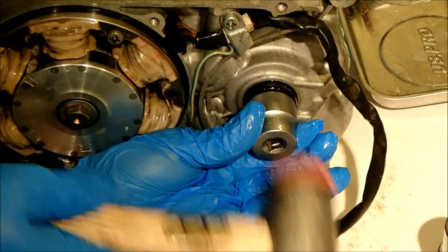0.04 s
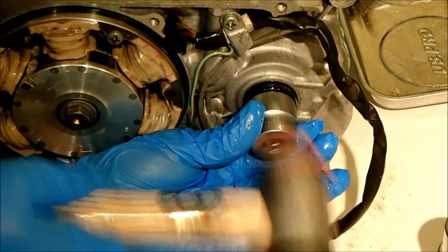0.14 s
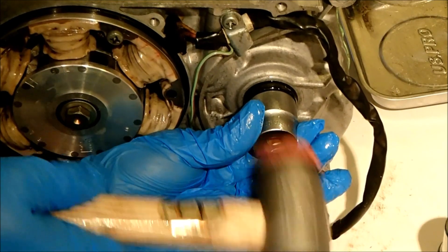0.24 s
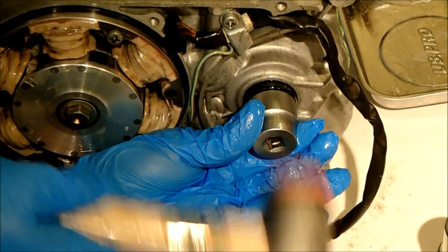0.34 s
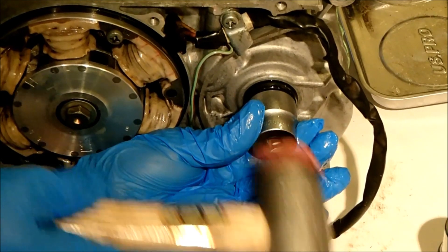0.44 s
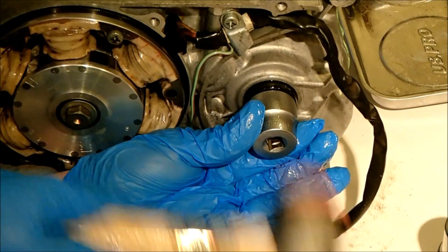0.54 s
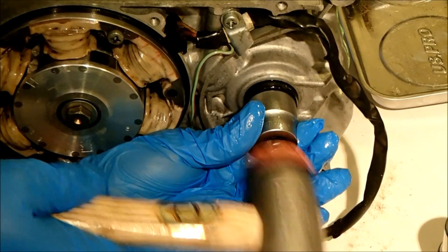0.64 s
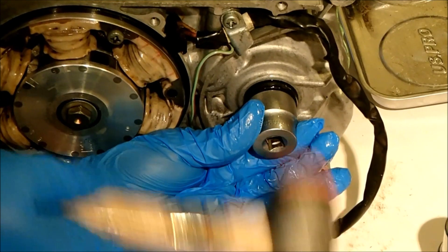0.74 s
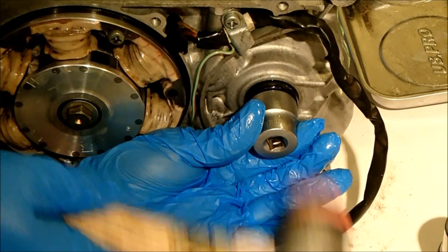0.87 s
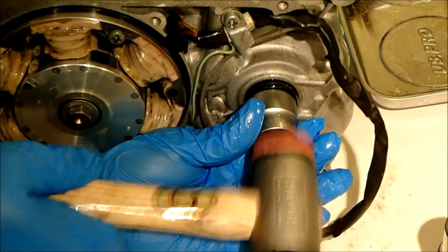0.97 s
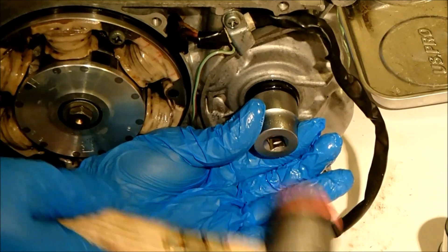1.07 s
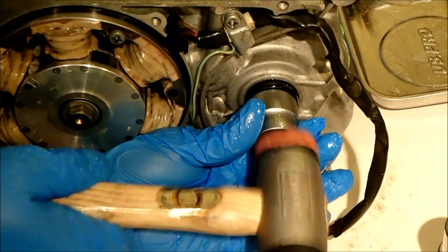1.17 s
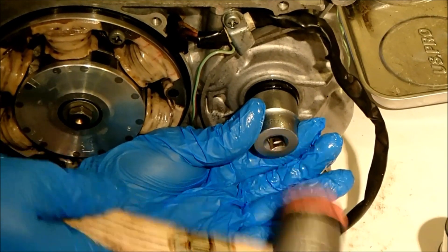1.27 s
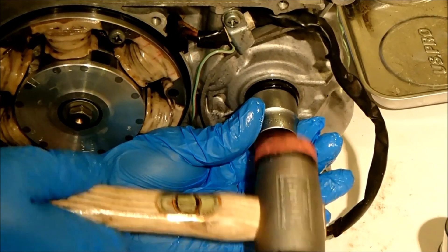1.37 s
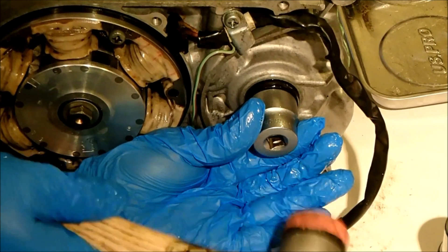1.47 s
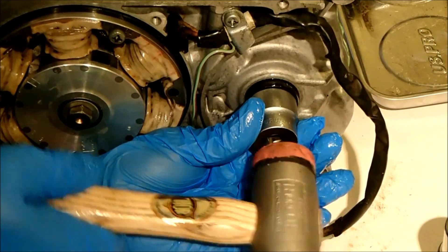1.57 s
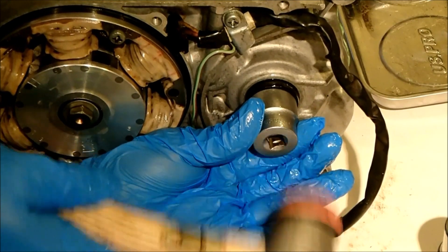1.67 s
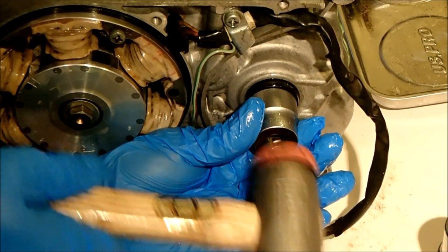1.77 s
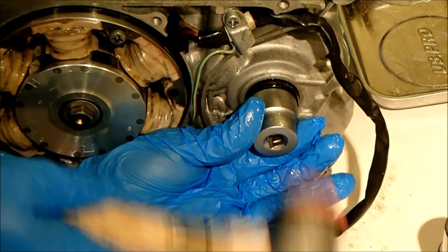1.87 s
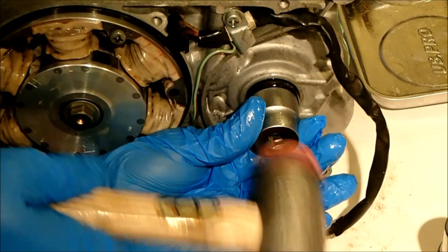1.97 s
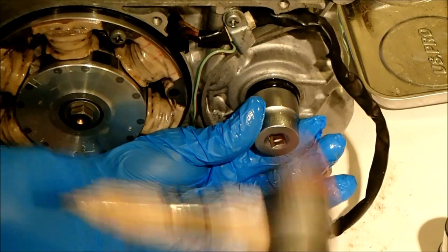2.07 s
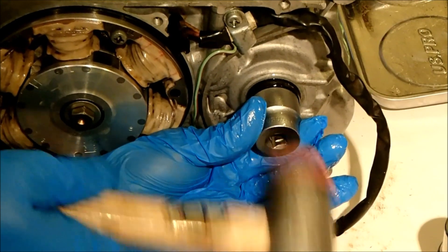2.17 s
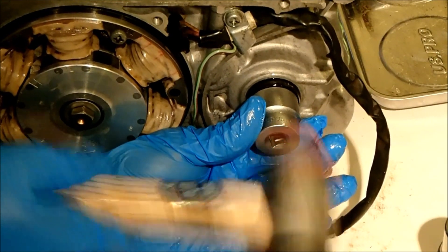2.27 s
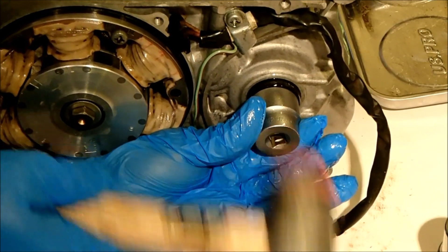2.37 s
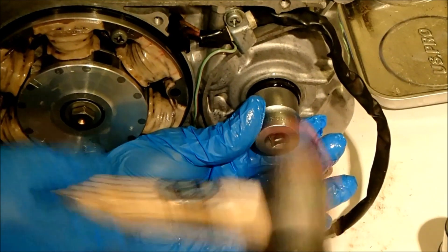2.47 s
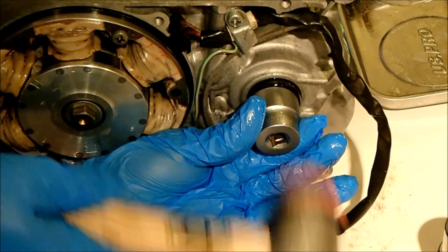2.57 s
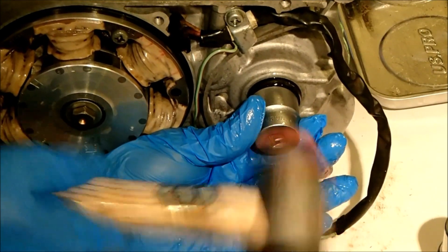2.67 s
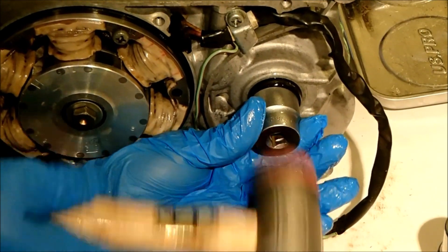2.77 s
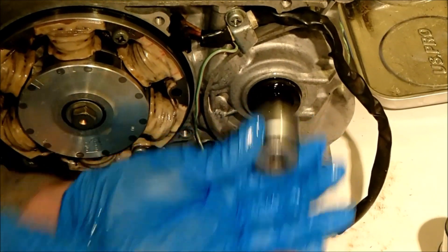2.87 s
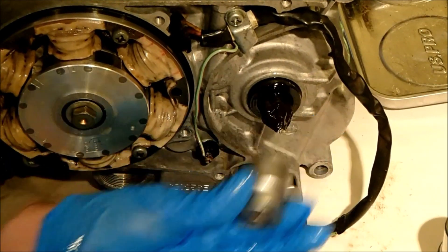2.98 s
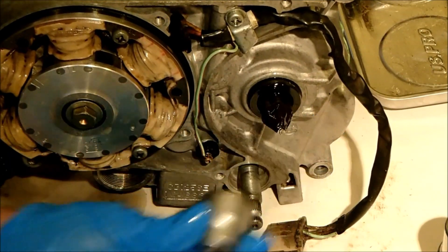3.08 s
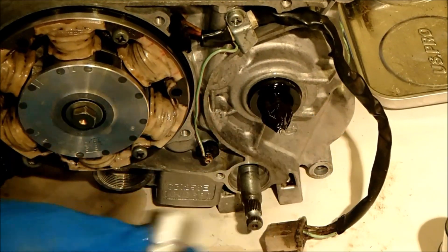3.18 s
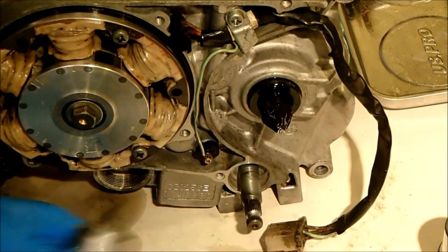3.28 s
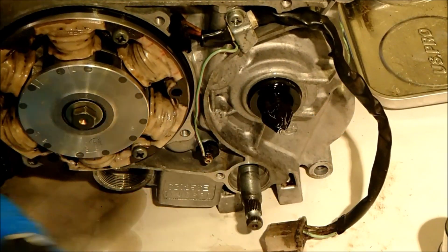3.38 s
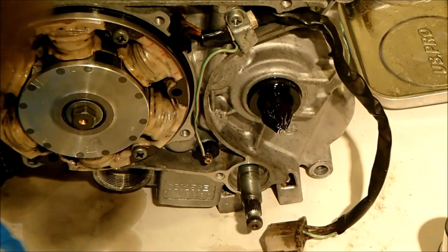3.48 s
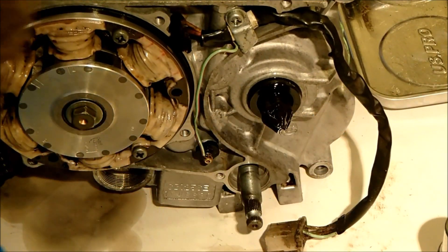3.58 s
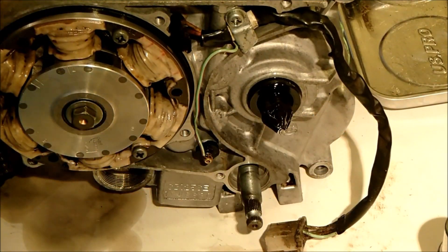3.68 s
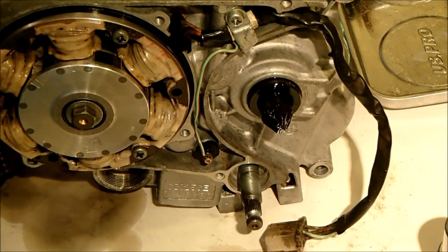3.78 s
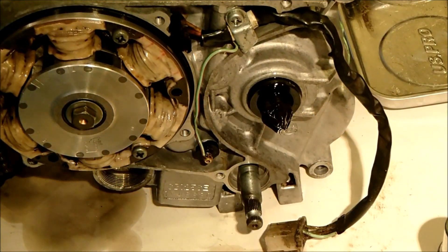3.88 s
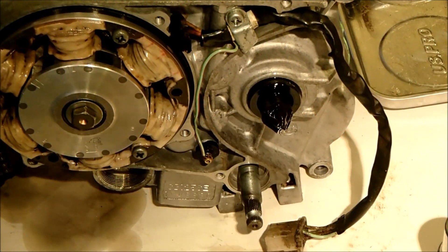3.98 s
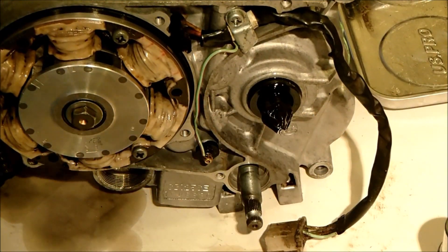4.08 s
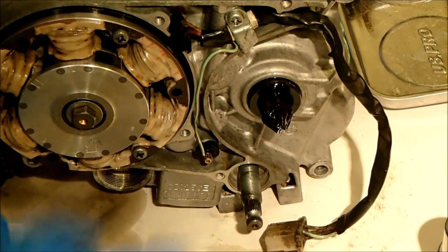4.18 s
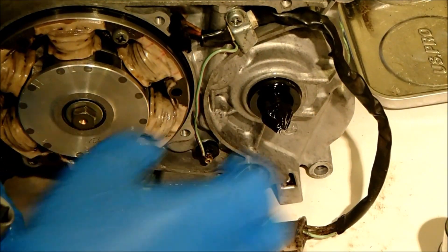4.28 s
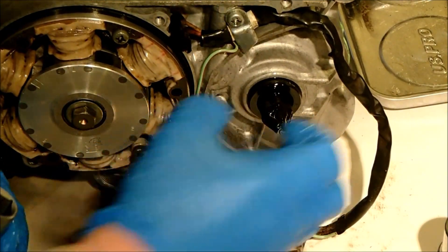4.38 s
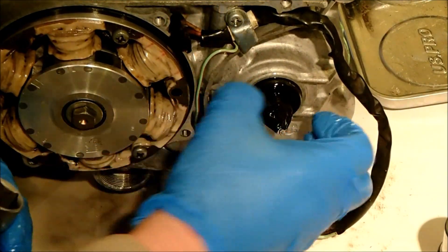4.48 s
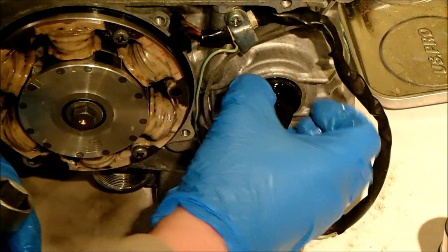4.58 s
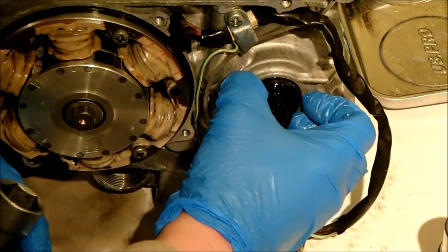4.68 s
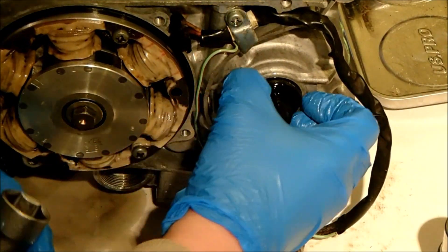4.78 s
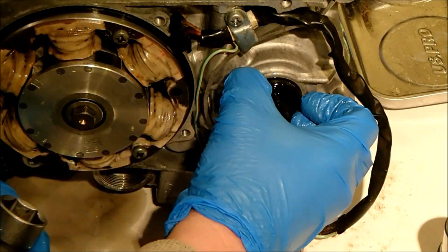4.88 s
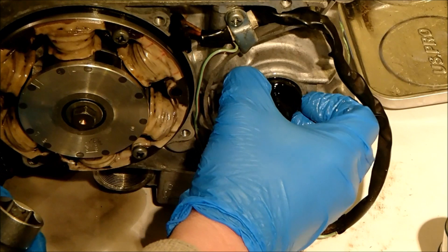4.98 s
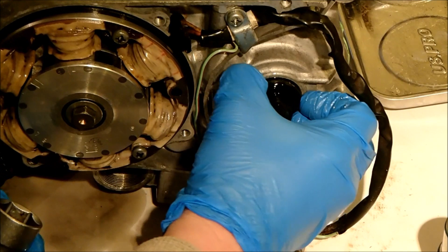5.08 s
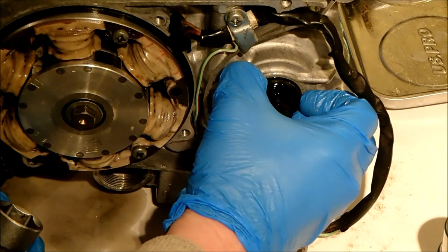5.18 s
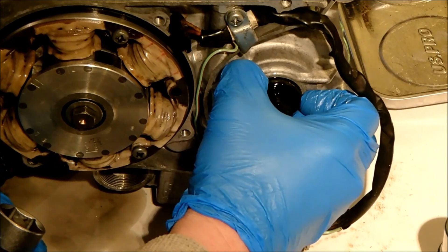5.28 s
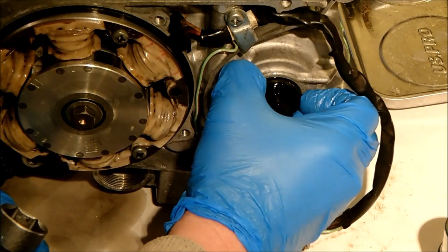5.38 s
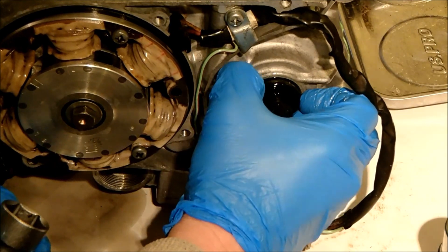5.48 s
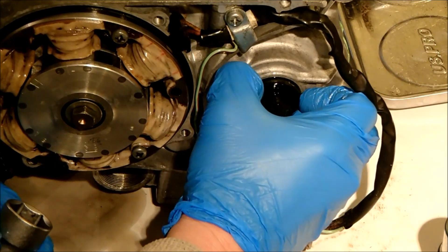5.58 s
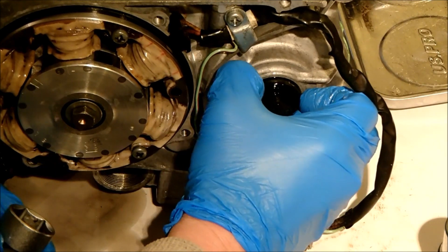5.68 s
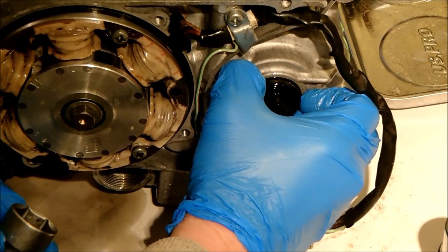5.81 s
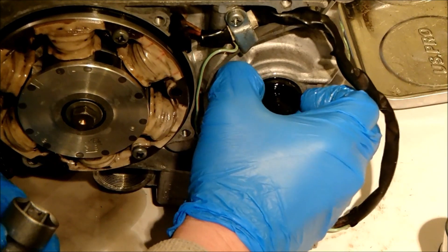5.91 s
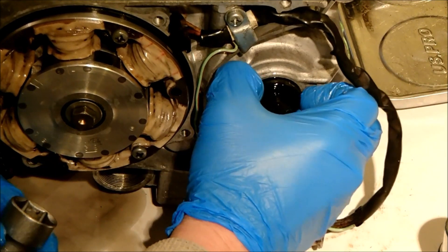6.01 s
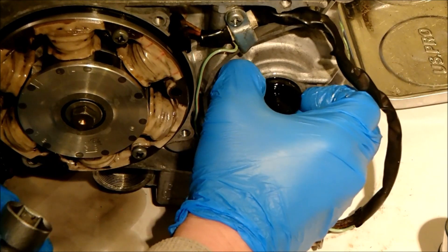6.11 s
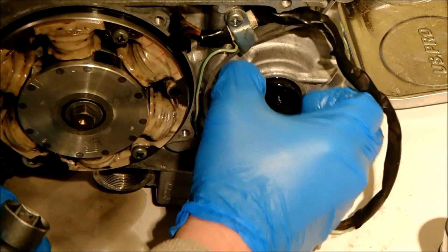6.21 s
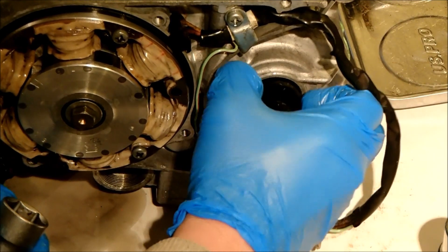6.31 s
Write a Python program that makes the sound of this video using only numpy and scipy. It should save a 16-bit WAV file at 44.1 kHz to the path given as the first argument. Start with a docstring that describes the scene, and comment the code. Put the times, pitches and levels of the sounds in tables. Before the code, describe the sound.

A soft-faced hammer raps a steel socket about five times a second against a hollow engine case, then bumps down on a bench before faint glove rustles.

```python
"""A soft-faced hammer taps a steel socket fourteen times, driving a seal into an aluminium engine case.
Each tap is a sharp pulse, a short burst and a swelling knock over the damped ringing modes of the case;
the engine booms low on its bench and the loose socket buzzes. Bouncing thumps then put the hammer down,
and filtered noise makes cloth swishes, glove clicks and faint rubs at the seal.
Behind it lie steady room noise and the wavering low hum of a fan, all heard by one close microphone."""
import sys
import numpy as np
from scipy import signal
from scipy.fft import rfft, irfft, next_fast_len
from scipy.io import wavfile
from scipy.ndimage import map_coordinates

SR = 44100
rng = np.random.default_rng(int(sys.argv[2]) if len(sys.argv) > 2 else 0)


def master(y):
    """Save y as 16-bit WAV."""
    cut = np.clip(np.atleast_2d(y).T, -1, 1)
    pcm = np.round(cut * 32767)  # scale
    wavfile.write(sys.argv[1], SR, pcm.astype(np.int16))


N = 279990
TIME = np.arange(N) / SR  # the whole scene, s
AFTER = np.arange(round(0.7 * SR)) / SR  # time since one contact, s


def amp(db):
    """Decibels to gain."""
    return 10 ** (np.asarray(db) / 20)


def unit(x):
    """Scale to rms 1."""
    return x / np.sqrt(np.mean(x ** 2) + 1e-20)


def along(points, hz):
    """Read (f/Hz, value) points on a log frequency axis."""
    point_hz, values = np.transpose(points)
    return np.interp(np.log(hz + 1), np.log(point_hz), values)


def add(track, s, sound):
    """Mix a sound into the track from time s, cut off at the end of the track."""
    part = track[round(s * SR):][:len(sound)]
    part += sound[:len(part)]


def coloured(x, gain):
    """Causal minimum-phase filter whose gain is a function of frequency."""
    m = 2 * next_fast_len(len(x))
    log_gain = np.log(np.maximum(gain(np.fft.rfftfreq(m, 1 / SR)), 1e-6))
    # folding the cepstrum onto positive time puts the response after the input
    cepstrum = irfft(log_gain)
    cepstrum[1:m // 2] *= 2
    cepstrum[m // 2 + 1:] = 0
    response = np.exp(rfft(cepstrum))
    return irfft(rfft(x, m) * response)[:len(x)]


def noise(spectrum, t):
    """Noise of rms 1 with the given spectral shape, as long as t."""
    white = rng.standard_normal(len(t))
    return unit(coloured(white, lambda hz: amp(along(spectrum, hz))))


def fade(t60):
    """A decay of 60 dB in t60 seconds."""
    return np.exp(-np.log(1000) * AFTER / t60)


def ring(modes, vary_db):
    """Damped modes at slightly new strengths; neighbours swing in opposite directions."""
    out = np.zeros(len(AFTER))
    for k, (hz, db, t60) in enumerate(modes):
        level = amp(db + vary_db * rng.standard_normal())
        out += (-1) ** k * level * fade(t60) * np.sin(2 * np.pi * hz * AFTER)
    return out


def wobble(rate):
    """A smooth random curve with rate knots a second, repeating after 200 knots."""
    return map_coordinates(rng.standard_normal(200), [TIME * rate], mode="wrap")


# hammer taps: (t/s, strength level/dB, hardness as treble lift level/dB, socket slack t/s)
TAP_EVENTS = [(0.110, -4.5, -12.5, 0.0025), (0.325, -7.5, -5, 0.006), (0.527, -4.5, -5.5, 0.013),
              (0.725, -2, -9.5, 0.0026), (0.921, -2, 5.5, .002), (1.122, -5.5, -4, 0.0028),
              (1.309, -4.5, 1.5, .005), (1.495, -2.5, -4, 0.0041), (1.677, -5, -2, 0.0058),
              (1.866, 0, -6.5, .004), (2.051, -4, -1.5, 0.0055), (2.245, -3, -3, 0.0019),
              (2.444, -1, -8.5, 0.0024), (2.641, -3, -3.5, 0.0061)]
# modes of socket and case, damped by the hand; a few steel ones ring on: (f/Hz, level/dB, t60 t/s)
CASE_MODES = [(202.3, -20, 0.17), (316.7, -28, 0.31), (333, -16, 0.16), (469, -25.5, 0.2), (529, -15, 0.05),
              (667, -19, 0.066), (745, -35.5, 0.77), (755, -22, 0.19), (832, -18, 0.17),
              (860, -11.5, 0.045), (1070, -37, 0.15), (1111.6, -6, 0.066), (1370, -14.5, 0.028),
              (1571, -16, 0.11), (1634, -32.5, 0.33), (1737, -35.5, 0.54), (1680, -38, 0.14),
              (2090, -18, 0.03), (2230, -21, 0.063), (2360, -34, .09), (2690, -28, .09), (3250, -56, 0.16),
              (3526, -21, 0.092), (3790, -40, 0.47), (3835, -41, 0.17), (5380, -47, 0.67),
              (6300, -42, 0.16), (6900, -35, 0.12)]
# the socket ringing freely: (f/Hz, level/dB, t60 t/s)
SOCKET_MODES = [(3880, -1, .15), (5350, -6, .14), (6870, -6.5, .1), (14600, 10, .012)]
PING_S, PING_DB = 2.444, -31  # once the grip eases
KNOCK_DB, KNOCK_SLOPE = -2.5, -0.65  # low knock, and its dB per dB of strength: light taps are rounder
SNAP_DB, SNAP_SLOPE = 2, 0.77  # top octave, and its rise in dB per dB of hardness
CRACK_DB, CRACK_SLOPE = 0.5, 0.49  # first pulse, and its rise in dB per dB of hardness


def taps():
    """Each blow rings the same case; the squarer the hit, the brighter."""
    out = np.zeros(N)
    body = wash()
    for s, db, hard_db, _ in TAP_EVENTS:
        # the contact point shifts a little, so part of the fine ringing is new at each blow
        fine = 0.8 * body + 0.6 * wash()
        # the socket seats itself in a burst of a few milliseconds
        seat = amp(-9.5) * noise(CLACK_SPECTRUM, AFTER) * fade(0.026)
        # a square hit packs its force into the first pulse
        strike = amp(CRACK_DB + CRACK_SLOPE * hard_db) * crack()
        contact = strike + seat + amp(-8.0) * press(s, swell_s=0.0029)
        ringing = amp(-7.0) * ring(CASE_MODES, vary_db=2.0) + amp(-17.0) * fine

        knock_db = KNOCK_DB + KNOCK_SLOPE * db + passed_db(s)
        snap_db = SNAP_DB + SNAP_SLOPE * hard_db
        hardness = [(600, knock_db), (1300, 0), (5000, hard_db), (12000, snap_db)]
        # hardness colours the contact fully and the ringing less
        blow = coloured(contact, lambda hz: amp(along(hardness, hz)))
        blow += coloured(ringing, lambda hz: amp(0.8 * along(hardness, hz)))
        add(out, s, amp(db) * blow)
    add(out, PING_S, amp(PING_DB) * ring(SOCKET_MODES, vary_db=1))
    return out


# spectrum of the crowd of finer case modes and near walls: (f/Hz, relative level/dB per Hz)
CLACK_SPECTRUM = [(120, -16), (250, -10), (450, -5.5), (700, -1.5), (1100, -4.5), (1700, -5), (2300, -7.5),
                  (3850, -8), (4400, -17.5), (5400, -11), (6300, -19.5), (7500, -26), (11000, -31.5),
                  (15500, -28.5)]


def crack():
    """The first sharp pressure pulse of a contact, peak 1."""
    click = signal.unit_impulse(len(AFTER))
    pulse = coloured(click, lambda hz: amp(along(CLACK_SPECTRUM, hz)))
    return pulse / np.abs(pulse).max()


# decay of those finer modes: (f/Hz, t60 t/s)
CLACK_DECAY = [(200, 0.5), (500, 0.2), (1100, 0.18), (3000, 0.14), (8000, 0.13), (15000, 0.1)]


def wash():
    """Countless fine modes and reflections as noise whose frequency bands decay at their own rates."""
    hz, t, bands = signal.stft(noise(CLACK_SPECTRUM, AFTER), SR, nperseg=256)
    decay = np.exp(-np.log(1000) * t / along(CLACK_DECAY, hz)[:, None])
    return signal.istft(bands * decay, SR)[1][:len(AFTER)]


# the seal flexing under the socket while the hammer presses: (f/Hz before the pitch factor, level/dB)
PUSH_MODES = [(370, -4.5), (520, -15.5), (1130, -1), (1330, -15.5)]


def press(s, swell_s):
    """The knock swells while the soft face is squeezed and dies as the hammer rebounds."""
    u = AFTER / swell_s
    squeeze = u * np.exp((1 - u * u) / 2)
    # the seal stiffens over the first blows, and no two blows land alike
    pitch = 1 - 0.3 * np.exp(-s / 0.3) + 0.025 * rng.standard_normal()
    flexing = np.zeros(len(AFTER))
    for hz, db in PUSH_MODES:
        level = amp(db + 1.34 * rng.standard_normal())
        flexing += level * np.sin(2 * np.pi * pitch * hz * AFTER)
    return squeeze * flexing


SEAT_S, LOOSE_DB = 0.88, -6  # time constant of the seating, and force passed by the loose seal


def passed_db(s):
    """Force passed to the case, growing towards 0 dB as the seal seats."""
    return LOOSE_DB * np.exp(-s / SEAT_S)


# the engine rocking on the bench; the close pair beats, so the boom swells late: (f/Hz, level/dB, t60 t/s)
ROCK_MODES = [(64.7, -3, 0.23), (70.5, -1.5, 0.18), (95.5, -11, 0.48), (107, -48, 0.38),
              (119.1, -10.5, 0.47)]
ROCK_DB, ROCK_SLOPE = -17, 0.31  # boom level, and its rise in dB per dB passed to the case


def rocking():
    """Each blow shoves the heavy engine, which booms on the bench."""
    out = np.zeros(N)
    for s, db, *_ in TAP_EVENTS:
        boom_db = ROCK_DB + ROCK_SLOPE * (db + passed_db(s))
        add(out, s + 0.0025, amp(boom_db) * ring(ROCK_MODES, vary_db=0.7))
    return out


# buzz of loose steel: (f/Hz, relative level/dB per Hz)
BUZZ_SPECTRUM = [(300, -14), (1200, -9), (3600, -3), (4400, -3), (5400, 5), (6400, -8), (8000, -16),
                 (15000, -14)]
CHATTER_DB, CHATTER_SLACK_S = -29.5, 0.0095  # rattle level at this slack
CHATTER_GROWS = 0.5  # power law of rattle amplitude with slack


def chatter():
    """Steel buzzes against the seal as the hammer takes up the slack: more slack, longer and louder."""
    swell = np.zeros(N)
    for s, _, _, slack in TAP_EVENTS:
        size = (slack / CHATTER_SLACK_S) ** CHATTER_GROWS
        swell += size * np.exp(-1.5 * np.abs(TIME - s) / slack)
    return amp(CHATTER_DB) * swell * noise(BUZZ_SPECTRUM, TIME)


# the hammer lands on the bench and bounces: (t/s, strength level/dB, hard contact click level/dB)
THUMP_EVENTS = [(3.698, -23, -52), (3.736, -11.5, -27.5), (3.812, -19, -47), (3.906, -13.5, -27),
                (3.979, -19.5, -40), (4.046, -25, -47)]
# clear modes of the bench top: (f/Hz, level/dB, t60 t/s)
BENCH_MODES = [(62.6, -19, 0.11), (81.7, -6.5, 0.35), (110, -6, 0.081), (177, -4, 0.17), (251.4, -5, 0.19),
               (296, -2, 0.088), (360, -17, 0.16), (404, -2, 0.048), (587, -12, 0.18), (708, -8, 0.17),
               (794, -14, 0.1), (912, -22, 0.27)]
# finer modes of the bench top: (f/Hz, relative level/dB per Hz)
BOARD_SPECTRUM = [(60, -9), (250, -6), (450, -10), (850, -11), (1100, -19), (3000, -19.5)]
# hiss of clicks and fibres: (f/Hz, relative level/dB per Hz)
HISS_SPECTRUM = [(200, -5), (900, 4.5), (2000, 2.5), (3600, 3), (4400, -5), (5500, 0.5), (7500, -12.5),
                 (15000, -18)]
FIRM_DB, FIRM_HZ = -12, 600  # strength of a firm landing, and its contact bandwidth
DOUBLING_DB = 5.5  # the bandwidth doubles with each such step of strength
FLEX_DB, FLEX_SLOPE = 0, -0.4  # bass of a firm landing, dB per dB: soft ones mostly flex the whole top
CLICK_LEAD_S = 0.002  # the click comes just before the bench gives


def thumps():
    """Head and handle land and bounce; a soft contact drives mainly the low modes of the bench."""
    out = np.zeros(N)
    for s, db, click_db in THUMP_EVENTS:
        # under its clear modes the top has a crowd of finer ones
        board = ring(BENCH_MODES, vary_db=2.0) + noise(BOARD_SPECTRUM, AFTER) * fade(0.2)

        firmness_db = db - FIRM_DB
        contact_hz = FIRM_HZ * 2 ** (firmness_db / DOUBLING_DB)
        softness = lambda hz: 1 / np.sqrt(1 + (hz / contact_hz) ** 4)
        bass_db = FLEX_DB + FLEX_SLOPE * firmness_db
        flex = [(25, bass_db - 2), (70, bass_db), (100, bass_db), (220, 0)]
        thump = coloured(board, lambda hz: softness(hz) * amp(along(flex, hz)))
        add(out, s, amp(db) * thump)

        click = noise(HISS_SPECTRUM, AFTER) * fade(0.079)
        add(out, s - CLICK_LEAD_S, amp(click_db) * click)
    return out


# sleeve and handle brush over the bench: (t/s of the peak, width t/s, level/dB)
BRUSH_EVENTS = [(4.01, 0.065, -38.5), (4.283, 0.055, -45), (4.5, 0.034, -42.5)]
# the glove clicks: (t/s, level/dB)
GLOVE_CLICKS = [(0.044, -53), (0.436, -46), (0.839, -46), (1.419, -46), (3.692, -39.5), (4.782, -45.5),
                (5.192, -46), (5.254, -48), (6.146, -36)]
# swish of cloth: (f/Hz, relative level/dB per Hz)
CLOTH_SPECTRUM = [(150, -9), (400, -13), (620, -14.5), (800, 1), (1100, -11.5), (1700, -11), (2500, -19),
                  (6000, -19.5), (12000, -32)]
BRUSH_HISS_DB = 0  # hiss of the fibres, relative to the swish
BRUSH_GRAIN_DB = 2  # the weave catches unevenly


def handling():
    """Soft swishes of cloth in smooth swells, and small clicks of the rubber glove with a faint tail."""
    fibres = noise(CLOTH_SPECTRUM, TIME) + amp(BRUSH_HISS_DB) * noise(HISS_SPECTRUM, TIME)
    swish = unit(amp(BRUSH_GRAIN_DB * wobble(160)) * fibres)
    strokes = sum(amp(db) * np.exp(-((TIME - s) / width) ** 2) for s, width, db in BRUSH_EVENTS)
    out = swish * strokes
    for s, db in GLOVE_CLICKS:
        decay = fade(0.036) + amp(-14.0) * fade(0.37)
        add(out, s, amp(db) * noise(HISS_SPECTRUM, AFTER) * decay)
    return out


CRINKLE_START_S, CRINKLE_LENGTH_S = 4.2, 1.55
CRINKLE_DB, CRINKLE_SPREAD_DB = -58.5, 8  # weakest rub, and the range above it


def crinkles():
    """Gloved fingers work on the seal: 36 faint rubs scattered at random, each a decaying noise."""
    strokes = np.zeros(N)
    for place, size in rng.random((36, 2)):
        start = CRINKLE_START_S + CRINKLE_LENGTH_S * place
        add(strokes, start, amp(CRINKLE_DB + CRINKLE_SPREAD_DB * size) * fade(0.063))
    return strokes * (amp(-3) * noise(CLOTH_SPECTRUM, TIME) + noise(HISS_SPECTRUM, TIME))


# room noise: (f/Hz, relative level/dB per Hz)
AIR_SPECTRUM = [(25, -10), (82, -14), (101, 6.5), (118, -10), (200, -10), (320, -5.5), (420, -10),
                (800, -8), (1600, -11.5), (2500, -16), (3600, -14.5), (4400, -22.5), (5400, -17),
                (7200, -25.5), (16000, -29.5)]
# a distant fan: (f/Hz, mean rms level/dB)
HUM_TONES = [(160.3, -60.5), (318.5, -61.5), (479, -65.5), (804, -67.5)]
AIR_DB = -49.5  # rms


def workshop():
    """Steady room noise and the slightly unsteady hum of a fan, its tones drifting in pitch together."""
    out = amp(AIR_DB) * noise(AIR_SPECTRUM, TIME)
    drifting_time = np.cumsum(1 + 0.00466 * wobble(9)) / SR
    for hz, db in HUM_TONES:
        level = np.sqrt(2) * amp(db + 2.15 * wobble(10))
        out += level * np.sin(2 * np.pi * hz * drifting_time)
    return out


def scene():
    """Everything as it reaches the microphone, in one channel."""
    hammering = taps() + rocking() + chatter()
    putting_down = thumps() + handling() + crinkles()
    return (hammering + putting_down + workshop())[None]


TOP_HZ = 15900  # band limit


def record(dry):
    """The recorder thins the deepest bass, rounds off the highest peaks and cuts at its band limit."""
    heard = signal.sosfilt(signal.butter(4, 39, "high", fs=SR, output="sos"), dry)
    rounded = heard / (1 + heard ** 6) ** (1 / 6)
    in_band = np.fft.rfftfreq(N, 1 / SR) < TOP_HZ
    return irfft(rfft(rounded) * in_band, N)


dry = scene()
out = record(dry)
master(out)
```